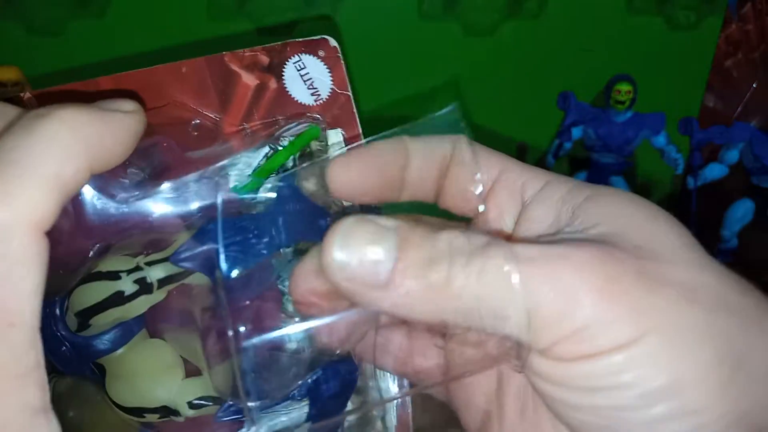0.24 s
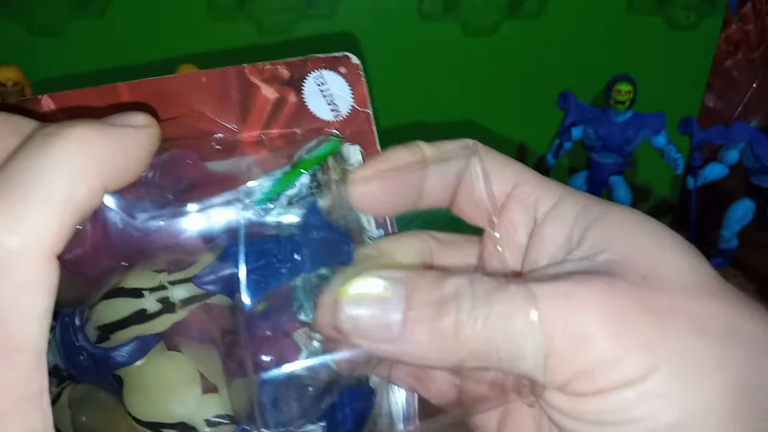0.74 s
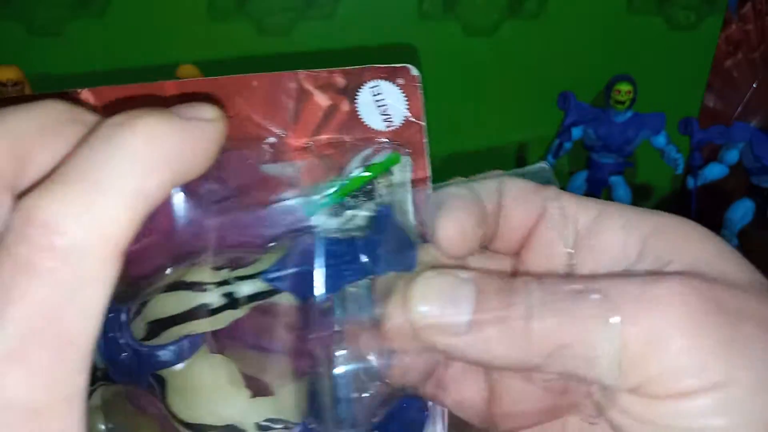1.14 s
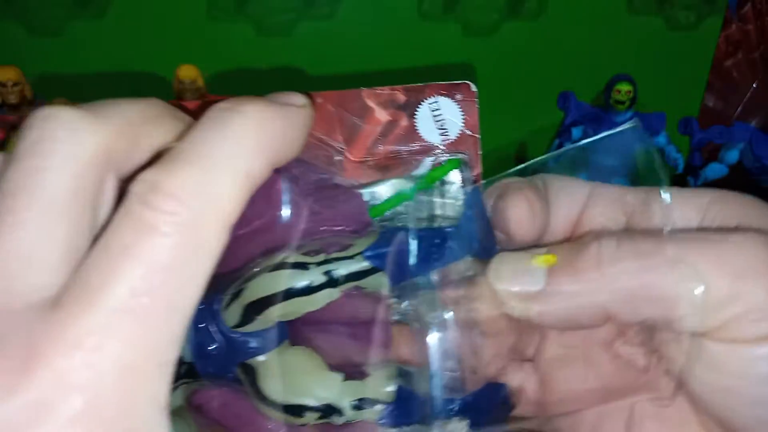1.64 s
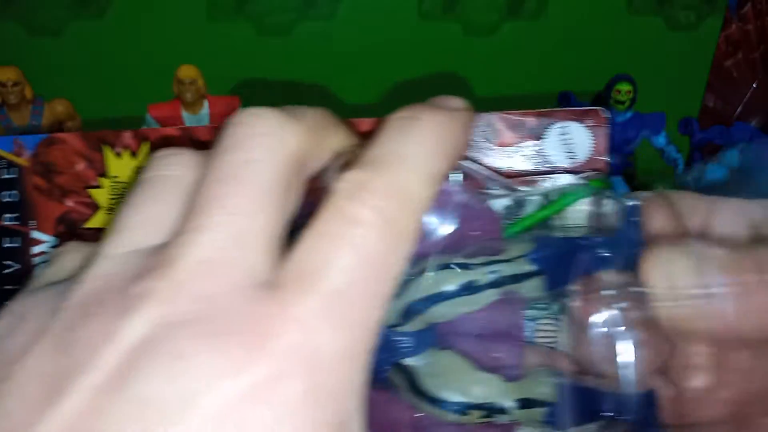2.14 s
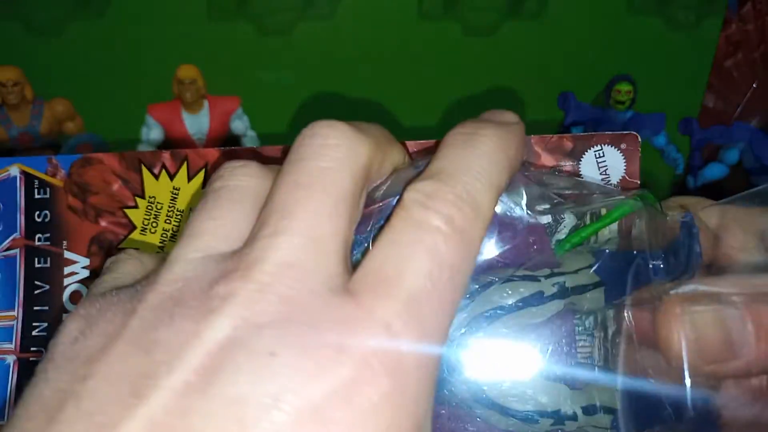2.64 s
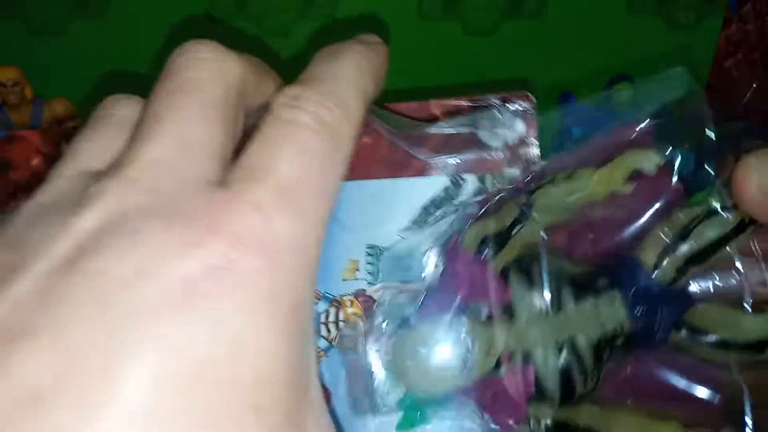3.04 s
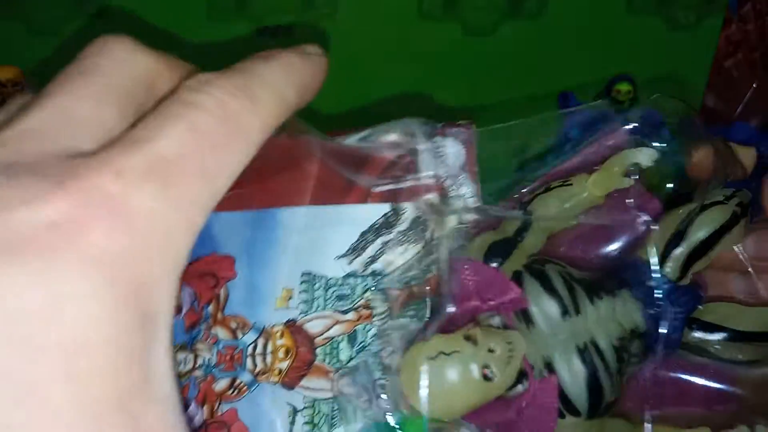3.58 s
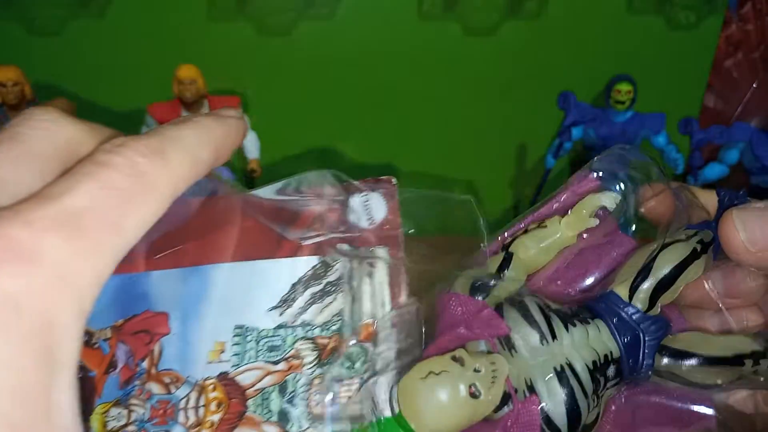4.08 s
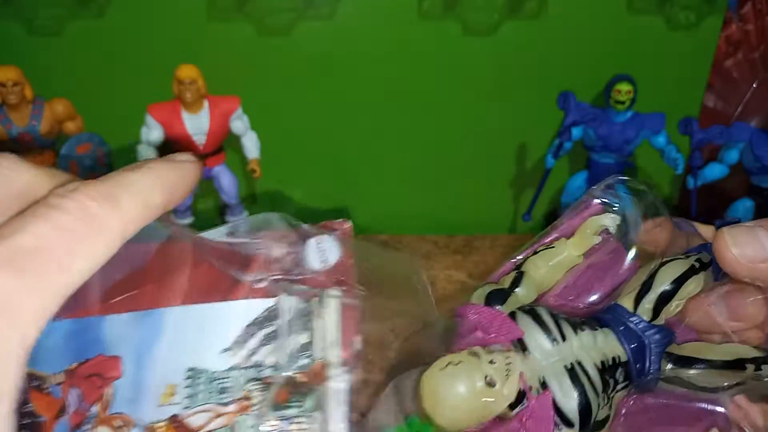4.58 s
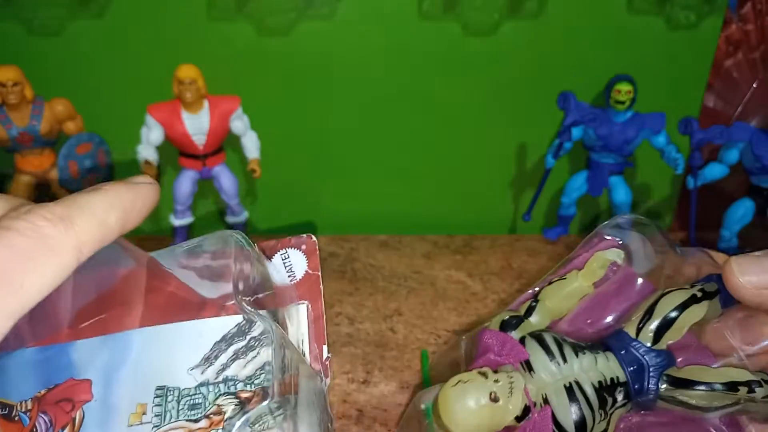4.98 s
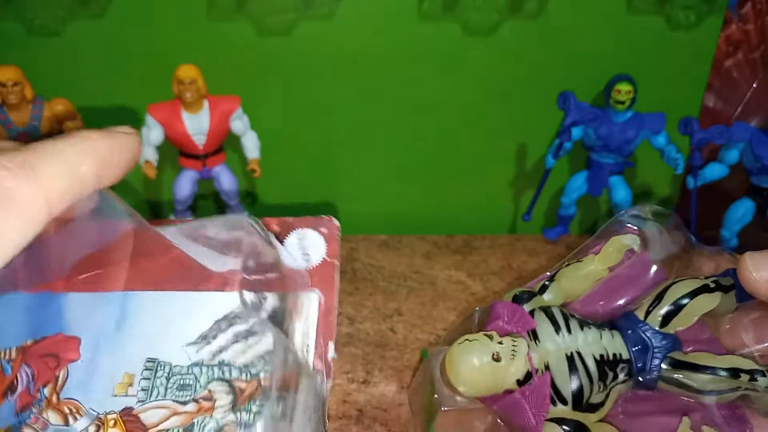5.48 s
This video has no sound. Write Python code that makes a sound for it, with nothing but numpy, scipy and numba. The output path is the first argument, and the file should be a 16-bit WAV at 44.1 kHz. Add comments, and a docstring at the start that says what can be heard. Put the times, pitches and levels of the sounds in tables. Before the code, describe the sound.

Close, dry plastic crackling and clicking builds from small ticks to a sharp snap and crunchy flurry, then thins out to near silence.

```python
"""Two hands pull a toy figure in its tray out of a stiff clear plastic blister, close to a phone.
Light snaps come first; the strongest falls near 2.6 s, a dense burst follows near 3 s, and a few end it.
In each snap a facet of the shell buckles: small slips ring the plastic and a broad noisy crack goes along.
Fine crackle and a dull scuff swell with every pull and after every snap, and a small room answers.
The phone turns the quiet moments down, under a faint steady hiss."""
import sys
import numpy as np
from scipy import signal
from scipy.fft import rfft, irfft
from scipy.io import wavfile
from scipy.ndimage import uniform_filter1d
from numba import njit

SR = 44100
rng = np.random.default_rng(int(sys.argv[2]) if len(sys.argv) > 2 else 0)


def put_to_file(sound):
    """Save the sound as 16-bit audio at rate SR, in the file named by the first command-line argument."""
    columns = np.atleast_2d(sound).T  # one column per channel
    safe = np.clip(columns, -1, 1)
    whole_steps = np.round(safe * 32767)
    wavfile.write(sys.argv[1], SR, whole_steps.astype(np.int16))


N = 252296

# The facets that buckle. Each row: start in seconds, peak level in dB before room and microphone,
# pitch of the facet in Hz, bass in dB, treble in dB, length of the slipping in ms.
FACET_SNAPS = [(0.0356, -28.5, 2210, -28, -75, 3.2), (0.067, -41, 1040, 20, -50, 2.6),
               (0.124, -33.5, 1940, -32, -79, 4.9), (0.1323, -29.5, 950, -21, -31, 3.1),
               (0.1754, -23, 1450, -12, -34, 1.9), (0.2129, -27.5, 1240, -10, -24, 1.1),
               (0.236, -36, 2000, -16, -44, 1.6), (0.2424, -34, 3300, -18, -37, 7.4),
               (0.2822, -34, 1210, -19, -27, 2.7), (0.2905, -28, 2360, -36, -40, 3),
               (0.323, -35.5, 2020, -30, -32, 3.4), (0.329, -26.5, 1230, -68, -38, 5),
               (0.37, -35, 1220, -32, -35, 3.8), (0.3962, -35, 1190, -37, -41, 3.1),
               (0.407, -28, 2170, -44, -43, 3.4), (0.4252, -33, 1690, -6, -26, 15),
               (0.4456, -30, 1980, -28, -39, 9.3), (0.4566, -33, 1770, -29, -42, 0.98),
               (0.5027, -39, 564, -24, -47, 5.1), (0.5807, -28, 1360, -6, -42, 6.6),
               (0.631, -28.5, 1660, 3, -29, 8.8), (0.6625, -26, 1650, -9, -43, 3.7),
               (0.697, -30, 1200, -37, -44, 3.9), (0.7267, -29.5, 2170, 1, -33, 15),
               (0.7379, -19.5, 2440, -6, -19, 3.2), (0.787, -28, 1520, -16, -24, 1.7),
               (0.7924, -28, 1250, 9, -14, 6.7), (0.803, -25, 1500, -27, -41, 8),
               (0.8467, -34, 765, 7, -43, 2.3), (0.8651, -18, 1540, -6, -26, 3.2),
               (0.906, -36, 2300, -8, -48, 8.8), (0.9679, -33, 1510, -31, -56, 2.8),
               (0.9997, -32, 2040, -32, -77, 9.5), (1.0692, -18, 920, -7, -22, 7.6),
               (1.1307, -22.5, 1820, -19, -28, 2.9), (1.1378, -22, 830, -32, -31, 4.6),
               (1.194, -20, 575, -16, -14, 6.8), (1.2655, -30, 2210, -28, -41, 5.8),
               (1.2773, -18.5, 535, -31, -24, 4.4), (1.2874, -20.5, 1580, 0, -29, 5.4),
               (1.3018, -19, 2030, -16, -66, 2), (1.3277, -30.5, 530, 16, -18, 3.6),
               (1.3916, -39.5, 1470, -38, -72, 3.9), (1.4393, -17, 1500, -13, -35, 4.6),
               (1.4561, -20, 2070, 4, -33, 3.8), (1.4761, -31, 525, -1, -24, 2.1),
               (1.5399, -37.5, 503, -4, -19, 5.8), (1.5528, -35.5, 1490, -30, -31, 3.8),
               (1.627, -15.5, 876, -25, -31, 6.9), (1.664, -25, 790, -6, -63, 3.8),
               (1.696, -41, 2100, -17, -27, 2.4), (1.7134, -25, 3400, -12, -40, 3.8),
               (1.7624, -36, 680, -6, -40, 6), (1.7816, -36.5, 2200, -25, -35, 4.7),
               (1.79, -37, 790, -33, -25, 4.1), (1.853, -28.5, 3220, -29, -40, 4.9),
               (1.8661, -32, 550, -22, -30, 3.4), (1.883, -16.5, 1560, -0.5, -18, 3.3),
               (1.8964, -21.5, 526, 1, -41, 8.8), (1.9927, -41, 834, -30, -33, 3.1),
               (2.0227, -30.5, 1550, -18, -14, 2.5), (2.0449, -22, 770, -72, -81, 1.4),
               (2.0624, -33, 2110, -9, -25, 4.2), (2.102, -35.5, 1550, -24, -41, 2.5),
               (2.1231, -31.5, 510, -19, -14, 2.6), (2.1318, -31, 2000, -27, -20, 2.8),
               (2.1559, -18.5, 820, -22, -27, 5), (2.1732, -17.5, 1530, -7, -48, 1.7),
               (2.1971, -23.5, 1110, -12, -17, 1.6), (2.2107, -30.5, 755, -9, -30, 14),
               (2.2322, -20, 546, -13, -22, 1.9), (2.2407, -19, 865, -13, -28, 9.1),
               (2.292, -35.5, 590, 15, -17, 6), (2.3149, -26, 1220, -21, -49, 2.5),
               (2.3505, -25.5, 1140, -20.5, -52, 3), (2.3811, -31.5, 1800, -4, -17, 3.4),
               (2.45, -36, 930, -10, -15.5, 3.6), (2.4709, -20, 1340, -3, -88.5, 2),
               (2.5168, -32.5, 1350, -3, -10.5, 3.8), (2.5301, -16.5, 1710, -11, -36.5, 9.8),
               (2.5876, 1, 1550, -11.5, -21.5, 2.08), (2.6857, -26.5, 1170, -1, -26, 2.1),
               (2.7197, -23, 1460, -6, -24, 4.1), (2.7242, -26, 780, -2.5, -13, 13.4),
               (2.7834, -18.5, 457, -13.5, -24.5, 3.5), (2.8259, -13.5, 1450, 1, -22.5, 5.3),
               (2.8386, -23, 1400, -13, -32, 2.5), (2.8636, -14.5, 1310, -22, -50, 1.4),
               (2.8945, -9, 1390, -19, -40.5, 3.6), (2.9354, -9.5, 1520, -21, -4.5, 5.1),
               (2.9489, -7, 1540, -20, -13.5, 7.5), (2.9644, -9.5, 3060, -12.5, -12.5, 10.3),
               (2.9908, -20, 2190, -7, -21, 13), (3.01, -12, 2170, -1, -21, 4.3),
               (3.0191, -12.5, 910, -8, -38, 2.7), (3.0435, -16.5, 596, -9, -34, 4.5),
               (3.0555, -15.5, 1680, -5, -33, 4.1), (3.0628, -12, 2310, -12.5, -3, 1.7),
               (3.0711, -11.5, 2300, -17, -9, 10.6), (3.0825, -9.5, 3140, -23, -20.5, 15),
               (3.098, -24.5, 2970, -24.5, -15.5, 4.9), (3.109, -12, 3020, -20, -7.5, 3.1),
               (3.2268, -6, 2180, -32.5, -13, 3.2), (3.3258, -11, 2270, -9, -27, 7.3),
               (3.3488, -30.5, 835, 26, -28, 2.1), (3.3571, -31, 740, -16, 26, 8.3),
               (3.447, -29, 1320, -11, -42, 2.4), (3.4604, -31, 1710, 6, -9, 2.1),
               (3.4798, -19, 2450, -59, 12, 4.3), (3.521, -34.5, 550, 12, -23, 5.7),
               (3.5874, -41, 885, -12, -58, 13), (3.655, -38, 2200, -32, -58, 18),
               (3.711, -36, 1400, -7, -35, 5.5), (3.7255, -14.5, 830, -36, -30, 7.5),
               (3.7375, -16, 2630, 9, -5, 8.6), (3.8797, -41, 1620, -8, -57, 8.8),
               (3.9112, -33.5, 2280, 3, -29, 12.5), (3.9702, -33.5, 1060, 0, -33, 18),
               (3.9924, -11.5, 2300, 0, -11, 3.2), (4.0652, -31, 880, -14, -56, 15),
               (4.0872, -28.5, 854, -12, -64, 21), (4.1014, -24.5, 3250, -34, -15, 16),
               (4.13, -32.5, 1110, -19, -27, 11), (4.156, -36, 2240, -13, -34, 22),
               (4.1818, -30, 2370, -36, -18, 9), (4.2348, -20.5, 924, -31, -4, 4.7),
               (4.2729, -36, 2600, -17, -3, 32), (4.3556, -38.5, 2400, -19, -49, 3.3),
               (4.39, -40, 830, 4, -31, 9.6), (4.4169, -37, 970, -34, -48, 9.3),
               (4.4537, -25.5, 840, -30, -4, 4.9), (4.47, -19, 3080, -28, -7, 6.6),
               (4.5453, -27.5, 3300, -24, 8, 4.3), (4.6782, -31.5, 780, -7, -36, 15),
               (4.721, -31.5, 710, -10.5, -31, 1.4), (4.7256, -34, 704, -8.5, -39.5, 6.4),
               (4.7365, -25, 624, -10.5, -46, 1.5), (4.7512, -32.5, 2300, -24.5, -14.5, 5.5),
               (4.7613, -26.5, 3970, -25, -5.5, 3.9), (4.772, -4, 490, -26.5, -17, 7.8),
               (4.905, -28.5, 3960, -39, -18, 9.1), (4.936, -36, 3950, -33, -16, 1.9),
               (4.965, -36.5, 4080, -53, -20, 13), (5.0059, -36, 3630, -40, -25, 2.1),
               (5.0297, -47, 3710, -31, -30, 12.2), (5.5993, -27.5, 2650, -34.5, -40.5, 1.5),
               (5.607, -38.5, 620, -16, -47, 2), (5.6182, -42, 876, -13, -48, 7.2),
               (5.6481, -38.5, 1434, -12, -59, 6.2)]
# Resonances of shell and card. Each row: pitch in Hz, width in Hz, relative level in dB.
SHELL_MODES = [(530, 50, -11.5), (797, 570, -39.5), (1540, 160, -13.5), (2108, 120, 0.5), (3150, 100, -8.5),
               (4050, 190, -15), (6190, 95, -12.5)]
# Basic tone colour of cracks and crackle. Each row: frequency in Hz, relative level in dB per Hz.
CRACK_COLOUR = [(24, -66.5), (40, -39), (186, -44), (473, -2.5), (639, -5), (802, 1.5), (1090, -4.5),
                (1540, 0), (1710, 0), (5180, -4.5), (8570, -21), (14500, -18.5), (16500, -39.5)]
BASS_HZ, TREBLE_HZ = 720, 6840  # edges of the tone controls
SNAP_SAMPLES = 4096  # room for one snap, about 93 ms


def undb(db):
    """Turn a level in dB into a plain gain."""
    return 10 ** (np.asarray(db) / 20)


def shape_db(table, hz):
    """Read a curve of (Hz, dB) points, with frequency on a logarithmic axis."""
    point_hz, point_db = np.transpose(table)
    return np.interp(np.log(np.maximum(hz, 1)), np.log(point_hz), point_db)


def tilt_db(hz, bass_db, treble_db):
    """Raise or lower the bass and the treble softly, like two tone controls."""
    bass = bass_db / (1 + (hz / BASS_HZ) ** 4)
    treble = treble_db * (1 - 1 / (1 + (hz / TREBLE_HZ) ** 1.3))
    return bass + treble


def loudest(rows):
    """Find the highest rms level over 2 ms in each row."""
    power = uniform_filter1d(rows ** 2, size=88, axis=1)
    return np.sqrt(power.max(1, keepdims=True))


@njit
def follow(x, attack, release):
    """Follow the level of a sound, quick up and slow down."""
    level, out = 0., np.empty(len(x))
    for i in range(len(x)):
        size = abs(x[i])
        level += (size - level) * (attack if size > level else release)
        out[i] = level
    return out


@njit
def ring(push, hz, t60, gain, sr):
    """Each row of pushes sets off its own damped resonances, which fall 60 dB in t60 seconds."""
    out = np.zeros(push.shape)
    for e in range(push.shape[0]):
        for m in range(hz.shape[1]):
            # one sample of turning and fading
            step = np.exp(2j * np.pi * hz[e, m] / sr - np.log(1000.) / (t60[e, m] * sr))
            z = 0j
            for i in range(min(push.shape[1], int(sr * (t60[e, m] + .03)))):
                z = z * step + push[e, i]
                out[e, i] += gain[e, m] * z.imag
    return out


def grains(per_s, spread_db, tail_s):
    """Spectrum of random clicks of uneven size, each smeared into a short fading tail of noise."""
    sizes = undb(spread_db * rng.exponential(size=N).clip(0, 3))
    clicks = (rng.random(N) < per_s / SR) * sizes
    tails = signal.lfilter([1], [1, -np.exp(-1 / (tail_s * SR))], clicks)
    return rfft(tails * rng.standard_normal(N))


def strain(order, rise_db_per_s=498, fall_db_per_s=399.5, settle_db=(-27, -34), settle_s=0.04):
    """Level in dB of crackle (1) or rubbing (2): the pulls plus the settling after every snap."""
    # Pulls on the tray, each straining the sheet for a while. Each row: start in seconds,
    # length in seconds, crackle in dB, rubbing on the card in dB, each before its own lift.
    pulls = [(0.0, 0.01, -49.5, -41.5), (0.14, 0.23, -59, -54), (0.413, 0.11, -56, -54.5),
             (.6, 0.29, -70, -56.5), (0.978, 0.25, -54.5, -50.5), (1.277, 0.041, -67, -54),
             (1.444, 0.1, -58, -57), (1.629, 0.1, -45.5, -58), (1.861, 0.042, -41, -57),
             (2.04, .36, -47, -57.5), (2.467, 0.26, -41.5, -51.5), (2.868, .26, -27.5, -38),
             (3.161, 0.029, -36, -48.5), (3.327, 0.085, -37, -52.5), (3.49, 0.288, -53.5, -54.5),
             (3.828, 0.062, -57.5, -61), (3.944, 0.41, -43, -56.5), (4.458, 0.048, -37.5, -44),
             (4.55, 0.13, -52.5, -66), (4.752, 0.1, -25.5, -39.5), (4.901, 0.13, -53.5, -68.5),
             (5.587, 0.044, -52.5, -69.5)]
    t = np.arange(N) / SR
    power = np.zeros(N)
    for row in pulls:
        start, hold, db = row[0], row[1], row[order + 1]
        before = np.maximum(start - t, 0)
        after = np.maximum(t - start - hold, 0)
        power += undb(2 * (db - rise_db_per_s * before - fall_db_per_s * after))
    # settling starts this far under the snap's peak, then dies away
    start, peak_db = np.transpose(FACET_SNAPS)[:2]
    kicks = np.bincount((start * SR).astype(int), undb(2 * (peak_db + settle_db[order - 1])), N)
    settling = signal.lfilter([1], [1, -np.exp(-2 / (settle_s * SR))], kicks)
    return 10 * np.log10(power + settling)


def air(level_db=-76.5):
    """Faint steady hiss of room and microphone: noise given a fixed tone colour."""
    # Colour of the hiss. Each row: frequency in Hz, relative level in dB per Hz.
    hiss_colour = [(29, -47), (50, -21), (340, 2.5), (776, 2), (1260, -0.5), (4450, -7), (8570, -15.5),
                   (15000, -7), (16500, -18)]
    gain = undb(shape_db(hiss_colour, np.fft.rfftfreq(N, 1 / SR)))
    hiss = irfft(rfft(rng.standard_normal(N)) * gain, N)
    return undb(level_db) * hiss / hiss.std()


def room(dry, t60_low=0.13, t60_high=0.026, wet_db=-18, gap_s=0.0019):
    """A small furnished room: diffuse echoes whose treble dies first."""
    t = np.arange(SR // 2) / SR
    noise = rng.standard_normal(len(t))
    low = signal.sosfilt(signal.butter(2, 5000, fs=SR, output="sos"), noise)
    high = noise - low
    echo = low * undb(-60 * t / t60_low) + high * undb(-60 * t / t60_high)
    echo *= t > gap_s  # the first echo comes a moment late
    echo /= np.sqrt(np.sum(echo ** 2))
    return dry + undb(wet_db) * signal.fftconvolve(dry, echo)[:N]


def rubbing(low_hz=150, high_hz=480, lift_db=4):
    """Skin and tray drag over the card: many small jerks blur into a soft, dull scuff."""
    f = np.maximum(np.fft.rfftfreq(N, 1 / SR), 1)
    jerks = grains(per_s=150, spread_db=1.5, tail_s=.012)
    dull = jerks / (1 + (low_hz / f) ** 3) / (1 + (f / high_hz) ** 3)
    drag = irfft(dull, N)
    return undb(strain(order=2) + lift_db) * drag / drag.std()


def crackle(treble_db=-3, lift_db=-1.5, shell_db=5):
    """Dense tiny clicks of the bent sheet fuse into a rustle that the shell colours."""
    f = np.fft.rfftfreq(N, 1 / SR)
    clicks = grains(per_s=450, spread_db=4.5, tail_s=.003)
    bumps = sum(1 / (1 + (2 * (f - hz) / width) ** 2) for hz, width, _ in SHELL_MODES)
    shell = 1 + undb(shell_db) * bumps
    colour = undb(shape_db(CRACK_COLOUR, f) + tilt_db(f, 0, treble_db))
    rustle = irfft(clicks * shell * colour, N)
    return undb(strain(order=1) + lift_db) * rustle / rustle.std()


def snaps(table, usual_bass_db=-10, usual_treble_db=-20, crack_db=2.0, tail_db=-19,
          facet_db=5.0, shell_db=-7, panels_db=-10.0):
    """Slips ring the facet, the shell and chance panels; a noisy crack with a rustling tail goes along."""
    start_s, peak_db, facet_hz, bass_db, treble_db, slip_ms = (c[:, None] for c in np.transpose(table))
    count, t = len(table), np.arange(SNAP_SAMPLES) / SR
    # the usual values leave the tone unchanged
    bass_db, treble_db = bass_db - usual_bass_db, treble_db - usual_treble_db
    noise = rng.standard_normal((count, SNAP_SAMPLES))
    dice = rng.random((count, SNAP_SAMPLES))
    chance = rng.random((count, 2, 20))  # pitch and weakness of 20 panels

    # the fold gives way, keeps slipping for a while, then lets go
    slip_s = np.clip(slip_ms, .3, 25) / 1000
    onset = 1 - np.exp(-t / (0.056 * slip_s))
    effort = onset / (1 + (t / (0.75 * slip_s)) ** 2.24)
    push = noise * (dice < .05) * effort
    push[:, 8] += .6  # one sure slip near the start

    # pitches: the facet, the slightly detuned shell, the panels from 330 to 6600 Hz
    modes = len(SHELL_MODES)
    shell_hz, width_hz, mode_db = np.transpose(SHELL_MODES)
    panel_hz = 330 * (6600 / 330) ** chance[:, 0]
    hz = np.hstack([facet_hz, shell_hz * (1 + 0.045 * noise[:, :modes]), panel_hz])

    # plastic damps hard: facets and panels the more so the higher they are
    facet_t60 = .018 * (1500 / facet_hz) ** .4
    shell_t60 = np.minimum(np.log(1000) / (np.pi * width_hz), .025)
    panel_t60 = .018 * (1500 / (2 * panel_hz)) ** .4
    t60 = np.hstack([facet_t60, np.tile(shell_t60, (count, 1)), panel_t60])

    facet_level = facet_db + 0 * facet_hz
    shell_level = shell_db + mode_db + 4 * noise[:, -modes:]
    panel_level = panels_db + shape_db(CRACK_COLOUR, panel_hz) - 13 * chance[:, 1]
    db = np.hstack([facet_level, shell_level, panel_level])
    rings = ring(push, hz, t60, undb(db + tilt_db(hz, bass_db, treble_db)), 1. * SR)

    f = np.fft.rfftfreq(SNAP_SAMPLES, 1 / SR)
    colour = undb(shape_db(CRACK_COLOUR, f) + tilt_db(f, bass_db, treble_db))
    hiss = irfft(rfft(noise, axis=1) * colour, axis=1)
    # the sheet rustles on after the crack
    rustle = hiss * (1 - effort) * np.exp(-t / .025) * (1 - np.exp(-t / slip_s))
    # slips come unevenly, so the crack stutters
    stutter = uniform_filter1d(1. * (dice > .975), size=40, axis=1) + .025
    crack = hiss * effort * np.sqrt(stutter / stutter.mean())
    crack = (crack + undb(tail_db) * rustle) / hiss.std(1, keepdims=True)

    sound = rings / loudest(rings) + undb(crack_db) * crack
    sound *= undb(peak_db) / loudest(sound)
    out = np.zeros(N + SNAP_SAMPLES)
    for start, one in zip((start_s[:, 0] * SR).astype(int), sound):
        out[start:start + SNAP_SAMPLES] += one
    return out[:N]


def scene():
    """Snaps, crackle and rubbing in the room."""
    return room(snaps(FACET_SNAPS) + crackle() + rubbing())[None]


def record(dry, gate_db=-56, slope=1.4, release_s=0.011, split_hz=6500, treble_gate_db=-66,
           treble_slope=0.94, mic_low_hz=303, rumble_hz=143, top_hz=16200):
    """The microphone drops the bass; the phone ducks quiet sound, rounds peaks and cuts both ends."""
    def duck(x, threshold_db, steepness):
        """Turn down what falls under a threshold, the more so the quieter it is."""
        level = follow(x[0].copy(), 0.18, 1 / (release_s * SR))
        return x * np.minimum(level / undb(threshold_db), 1) ** steepness

    thin = signal.sosfilt(signal.butter(2, mic_low_hz, "high", fs=SR, output="sos"), dry)
    low = signal.sosfiltfilt(signal.butter(2, split_hz, fs=SR, output="sos"), thin)
    # the treble is ducked on its own first, then everything together
    treble = duck(thin - low, treble_gate_db, treble_slope)
    ducked = duck(low + treble, gate_db, slope)
    rounded = ducked / (1 + np.abs(ducked / .9) ** 4) ** .25
    hissing = rounded + air()  # added after the ducking, so it stays steady
    cut = signal.sosfilt(signal.butter(2, rumble_hz, "high", fs=SR, output="sos"), hissing)
    return signal.sosfilt(signal.ellip(12, .2, 80, top_hz, fs=SR, output="sos"), cut)


dry = scene()
out = record(dry)
put_to_file(out)
```